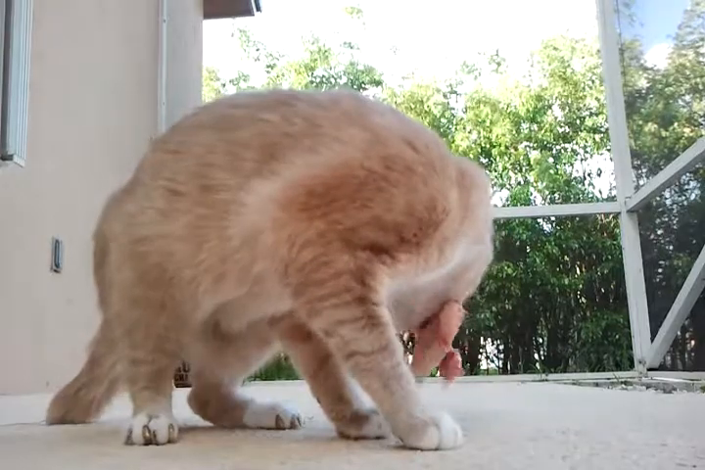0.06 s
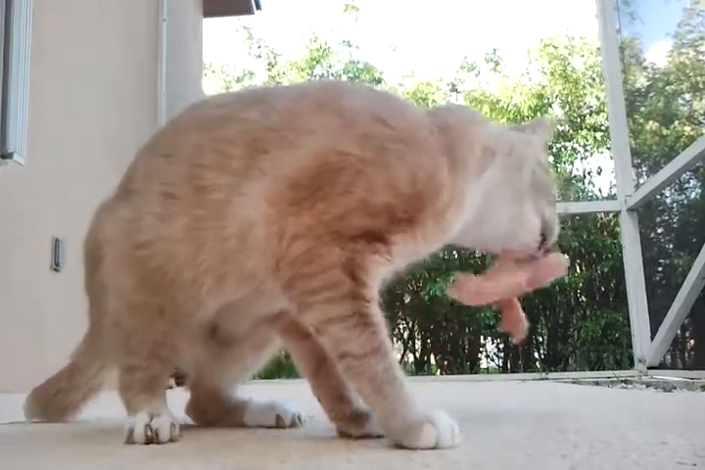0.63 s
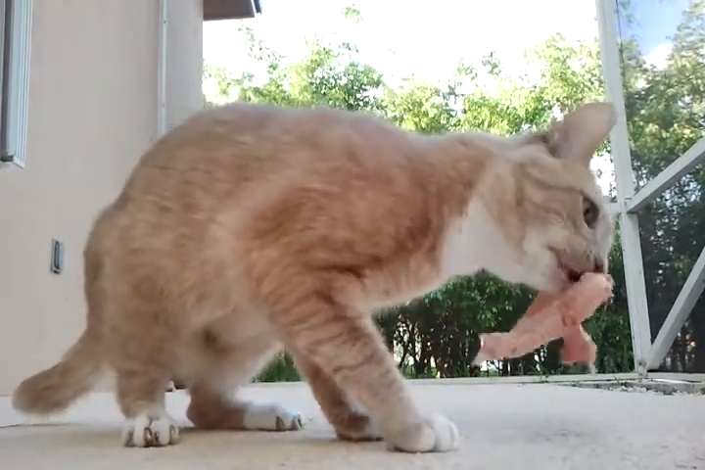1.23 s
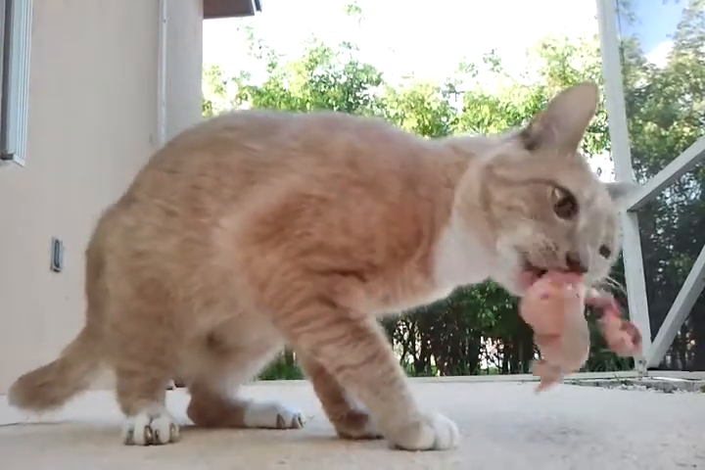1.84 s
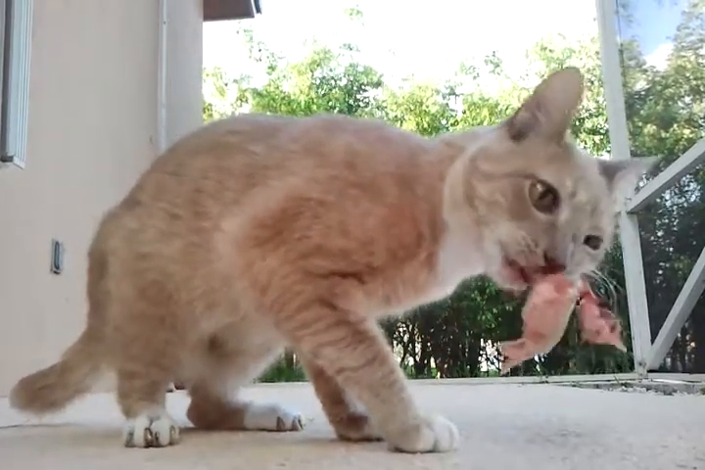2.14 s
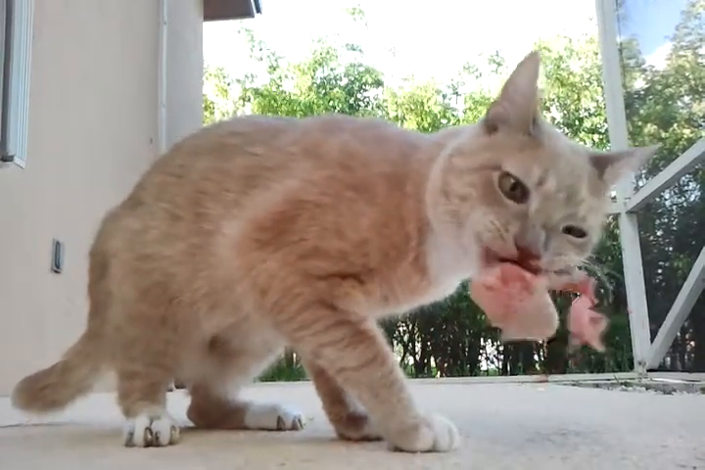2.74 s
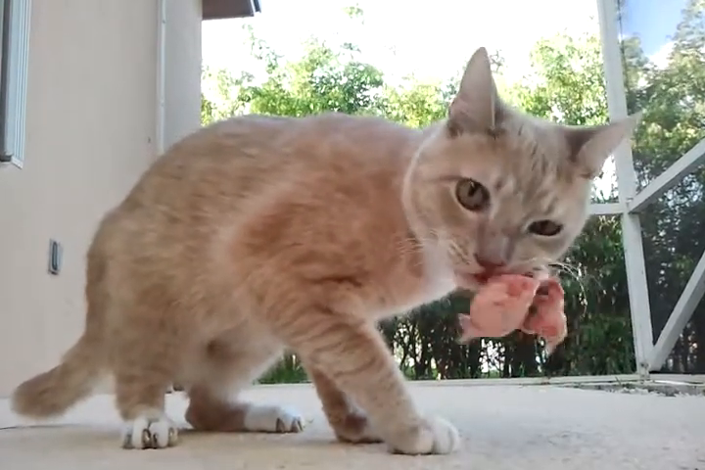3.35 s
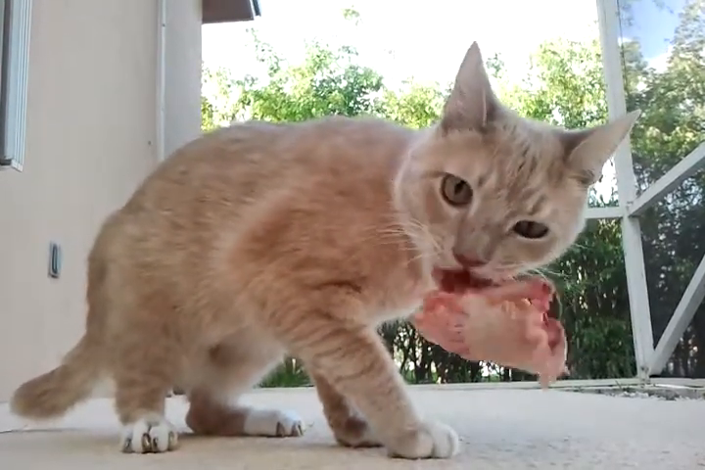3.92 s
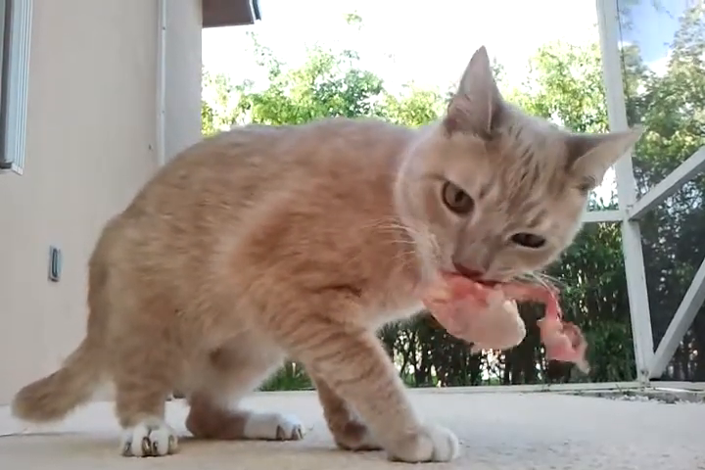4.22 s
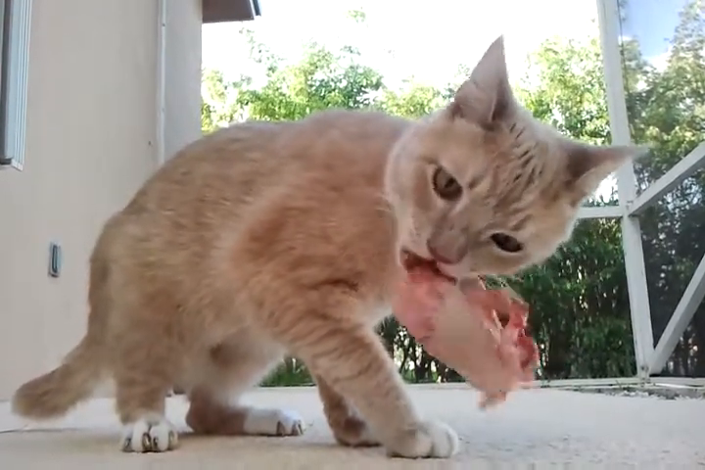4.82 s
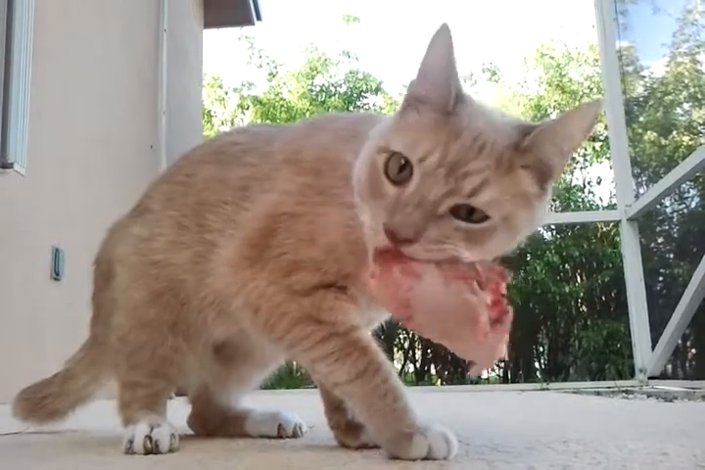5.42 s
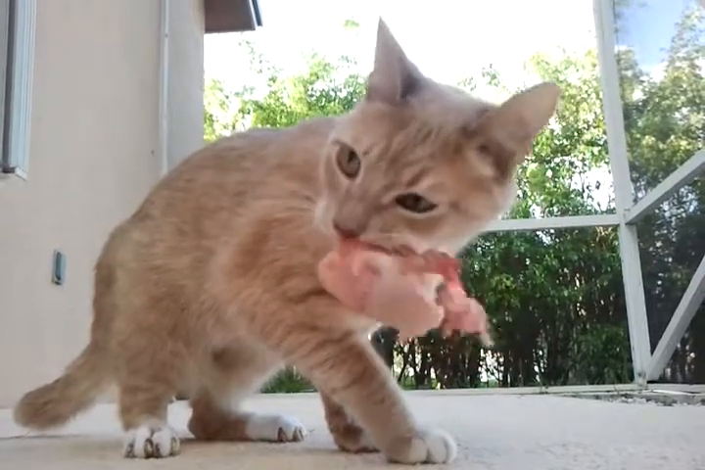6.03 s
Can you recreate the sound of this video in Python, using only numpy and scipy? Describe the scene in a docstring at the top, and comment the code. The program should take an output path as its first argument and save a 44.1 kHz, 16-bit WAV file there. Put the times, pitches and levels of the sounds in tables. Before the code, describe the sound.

Two quick, crisp cracks of bone open the sound as a cat eats a raw chicken wing on a screened porch. The cat then chews softly and steadily, its teeth clicking and the meat squishing in tiny wet pops, all heard from close by. A gentle outdoor hiss and a far motor hum lie underneath, and distant traffic rises gently toward the end, around one brighter tooth click.

```python
"""A screened porch, where a cat chews a raw chicken wing close by.
The bone gives way in two sharp crunches, each a run of fractures that ring it and knock the jaw.
Then teeth tick and wet meat squelches in clouds of tiny pops, with a short echo off walls and roof.
Behind it: soft outdoor air and hiss, a far motor hum that fades, and distant traffic that swells
near the end."""
import sys
import numpy as np
from scipy import signal
from scipy.fft import rfft, irfft, next_fast_len
from scipy.io import wavfile
from scipy.ndimage import uniform_filter1d, map_coordinates

SR = 44100
rng = np.random.default_rng(int(sys.argv[2]) if len(sys.argv) > 2 else 0)


def master(y):
    """Save y as 16-bit WAV."""
    cut = np.clip(np.atleast_2d(y).T, -1, 1)
    pcm = np.round(cut * 32767)  # scale
    wavfile.write(sys.argv[1], SR, pcm.astype(np.int16))


N = 272096


def amp(db):
    """Decibels to gain."""
    return 10 ** (np.asarray(db) / 20)


def unit(x):
    """Scale to rms 1."""
    return x / np.sqrt(np.mean(x ** 2) + 1e-20)


def along(points, hz):
    """Read (frequency [Hz], value) points on a log frequency axis."""
    f, v = np.transpose(points)
    return np.interp(np.log(hz + 1), np.log(f), v)


def wobble(rate):
    """A smooth random curve, rate knots a second."""
    knots = rng.standard_normal(int(N * rate / SR) + 4)
    return map_coordinates(knots, [np.arange(N) * rate / SR])


def filtered(x, response):
    """Shape x with a frequency response."""
    m = next_fast_len(len(x) + SR // 10)
    return irfft(rfft(x, m) * response(np.fft.rfftfreq(m, 1 / SR)), m)[:len(x)]


def resonance(f, hz, width):
    """A causal resonance, applied twice for steep skirts."""
    return (1j * f * width / (hz * hz - f * f + 1j * f * width)) ** 2


def hump(f, hz, octaves):
    """A round-topped band around hz; octaves is its full width at half power."""
    return np.sqrt(.5 ** ((2 * np.log2((f + 1) / hz) / octaves) ** 2))


def noise(spectrum):
    """Coloured noise of rms 1."""
    return unit(filtered(rng.standard_normal(N), lambda f: amp(along(spectrum, f))))


def tone(hz):
    """A sine of rms 1 that follows a pitch curve."""
    return unit(np.sin(2 * np.pi * np.cumsum(hz) / SR))


def add(track, s, sound):
    """Mix a sound into the track at time s."""
    start = max(round(s * SR), 0)
    track[start:start + len(sound)] += sound[:N - start]


def patchy(x, depth_db):
    """Moving air lets patches of a far sound swell and fade."""
    z = signal.stft(x, nperseg=2048)[2]
    patches = uniform_filter1d(rng.standard_normal(z.shape), size=7, axis=0)
    patches = uniform_filter1d(patches, size=5, axis=1)
    return unit(signal.istft(z * amp(depth_db * unit(patches)), nperseg=2048)[1][:N])


def passing(nearest_s, half_s, db):
    """Gain of a source on a straight road: one over distance, 3 dB down half_s from its nearest."""
    return amp(db) / np.hypot(1, (np.arange(N) / SR - nearest_s) / half_s)


def outdoor_air(level_db=-49.5):
    """A soft, steady bed of open air."""
    # air colour: (frequency [Hz], relative level [dB])
    spectrum = [(20, -46), (35, -20), (55, -9), (85, 5), (130, -0.5), (235, 4.5), (320, -3.5), (550, -5.5),
                (900, 0.5), (1250, 0), (1800, -4), (2600, -10), (4000, -32.5)]
    return amp(level_db + 0.33 * wobble(4.37)) * patchy(noise(spectrum), depth_db=0.58)


def hiss(far_db=-52):
    """A fine hiss that grows as the traffic passes."""
    # hiss colour: (frequency [Hz], relative level [dB])
    spectrum = [(1500, -18), (2600, -10), (3050, -3), (3450, 1.5), (4000, -5.5), (4900, -5), (5700, -9),
                (6500, -11), (7300, -10.5), (8000, -18), (8600, -33)]
    swell = np.hypot(amp(far_db), passing(nearest_s=5.34, half_s=1.46, db=-46))
    return swell * amp(0.23 * wobble(9)) * noise(spectrum)


def traffic_roar():
    """Far tyres roar past, with a drone inside the noise."""
    # tyre roar: (frequency [Hz], relative level [dB])
    tyres = [(200, -22), (400, -3), (600, -3.5), (830, -1), (1200, -2), (1700, -5.5), (2500, -10.5),
             (5000, -32)]
    # drone bands: (frequency [Hz], width [Hz], level against the tyres [dB])
    drone = [(693, 15, -21.5), (877, 68, -14.5)]
    roar = patchy(noise(tyres), depth_db=2.5)
    for hz, width, db in drone:
        roar += amp(db) * unit(filtered(rng.standard_normal(N), lambda f: resonance(f, hz, width)))
    return passing(nearest_s=5.23, half_s=0.69, db=-45) * roar


def traffic_rumble(peak_s=5.3, peak_db=-49, rise_db_per_s=22, fall_db_per_s=4.5):
    """The low end comes in quickly once the traffic is close, and lingers."""
    # rumble colour: (frequency [Hz], relative level [dB])
    spectrum = [(90, -27.5), (135, -1), (168, 3.5), (210, -3), (330, -0.5), (480, -2), (700, -35)]
    since = np.arange(N) / SR - peak_s
    level_db = peak_db + np.minimum(rise_db_per_s * since, -fall_db_per_s * since)
    return amp(level_db) * patchy(noise(spectrum), depth_db=1.5)


def traffic_whine(hz=823):
    """A thin, wavering whine goes by with the traffic."""
    swell = passing(nearest_s=4.8, half_s=1.1, db=-60.5)
    return swell * amp(2.5 * wobble(6)) * tone(hz + 3 * wobble(7))


def motor_hum(hz=138.4, start_db=-54, rest_db=-69, fade_s=5):
    """A far motor's hum wavers and fades toward a faint resting level."""
    level_db = rest_db + (start_db - rest_db) * np.exp(-np.arange(N) / SR / fade_s)
    return amp(level_db + 1.3 * wobble(9)) * tone(hz + 0.66 * wobble(10))


def porch(x, delay_s=0.011, build_s=0.01):
    """Walls and roof answer a moment later with a short diffuse tail."""
    # porch ring: (frequency [Hz], time to fall 60 dB [s])
    ring_times = [(300, 0.21), (5000, 0.21), (8000, 0.22)]
    # tail EQ: (frequency [Hz], gain [dB])
    colour = [(2500, -15.5), (3900, 10.5), (4900, -5.0), (6000, 9.5), (7000, -9.0)]
    hz, t, z = signal.stft(rng.standard_normal(SR // 2), SR, nperseg=256)
    swell = 1 - np.exp(-np.maximum(t - delay_s, 0) / build_s)
    decay = amp(-60 * t / along(ring_times, hz)[:, None])
    tail = signal.istft(z * swell * decay, SR, nperseg=256)[1]
    tail = filtered(tail / np.linalg.norm(tail), lambda f: amp(along(colour, f)))
    return signal.fftconvolve(x, tail)[:N]


def meat(spiky=0.86, chew_count=12, start_s=1.17, chews_per_s=2.4, uneven_s=.02):
    """Each squeeze is a short cloud of tiny wet pops; soft ones keep time with the jaw."""
    # standout wet squeezes: (centre [s], length [s], level [dB], pitch [Hz], width [octaves])
    squelches = [(0.607, 0.015, -44, 4060, .35), (0.649, .014, -41, 2600, 0.64),
                 (1.207, .009, -42.5, 3800, 0.4), (1.496, .022, -47.5, 3300, .9),
                 (1.628, 0.023, -47.5, 3180, 0.64), (2.167, 0.016, -44.5, 3300, .27),
                 (2.997, .011, -41.5, 3260, .55), (5.49, .016, -42.5, 3800, .45),
                 (5.552, .022, -42, 3480, .25), (5.69, .019, -43.5, 3950, .32)]
    out = np.zeros(N)
    t = np.arange(-SR // 10, SR // 10) / SR
    beats = start_s + np.arange(chew_count) / chews_per_s + uneven_s * rng.standard_normal(chew_count)
    soft_chews = [(s, 0.027, -52, 3600, .85) for s in beats if s < N / SR]  # same columns
    for s, length, db, hz, octaves in squelches + soft_chews:
        pops = rng.standard_normal(len(t)) * np.exp(spiky * rng.standard_normal(len(t)))
        squeeze = np.exp(-2 * (t / length) ** 2)
        add(out, s + t[0], amp(db) * squeeze * unit(filtered(pops, lambda f: hump(f, hz, octaves))))
    return out


def tick(hz, octaves, rebound_gain=0.53, rebound_s=0.001024):
    """A snap of a few cycles and its weaker rebound: peak 1, centred in 20 ms."""
    blow = signal.unit_impulse(SR // 50, 'mid')
    rebound = np.roll(blow, round(rebound_s * rng.uniform(.6, 1.4) * SR))
    snap = filtered(blow + rebound_gain * rebound, lambda f: hump(f, hz, octaves))
    return snap / np.abs(snap).max()


def teeth(faint_count=40, faint_db=-41, spread_db=7):
    """Distinct tooth contacts, with faint sticky ticks scattered between them."""
    # tooth contacts: (time [s], peak level [dB], pitch [Hz], width [octaves])
    contacts = [(.2532, -27.5, 4500, 0.31), (.6372, -25, 3650, .67), (1.121, -30, 2600, .46),
                (1.212, -24, 3450, 0.72), (1.480, -32.5, 2500, .35), (1.581, -27.5, 2440, 0.55),
                (1.784, -20.5, 2800, 1.06), (1.948, -30, 5700, .51), (2.014, -29, 3550, .76),
                (2.388, -24, 3970, 0.77), (2.611, -33, 3250, .3), (3.146, -30.5, 4130, .33),
                (3.661, -25.5, 3360, 0.94), (3.876, -25.5, 3300, .27), (4.124, -32, 3800, .3),
                (4.849, -30.5, 4300, .3), (5.492, -12, 4040, 0.34), (6.140, -23, 3580, 0.76)]
    out = np.zeros(N)
    for s, db, hz, octaves in contacts:
        add(out, s - 0.01, amp(db) * tick(hz, octaves))  # the snap's centre lands on s
    for when, size, pitch in rng.random((faint_count, 3)):
        add(out, when * N / SR, amp(faint_db + spread_db * size ** 2) * tick(2400 * 2 ** pitch, 0.6))
    return out


def fracture(tilt_db, knock_db, splinter_s=0.00034, splinter_db=-18, jaw_hz=590):
    """One fracture sheds splinters, rings the bone and knocks the jaw: peak 1."""
    # bone resonances: (frequency [Hz], width [Hz], relative level [dB])
    modes = [(2660, 890, -21), (3200, 480, -9.5), (4700, 410, -3.5), (4907, 470, 3.5), (5270, 300, -2.5),
             (6880, 300, -11), (7140, 630, -3.5), (8250, 450, -24)]
    t = np.arange(SR // 100) / SR
    force = amp(splinter_db) * rng.standard_normal(len(t)) * np.exp(-t / splinter_s)
    force[0] = rng.choice([-1, 1])  # the break itself
    tilted = [(hz, width, db + tilt_db * np.log2(hz / 5000)) for hz, width, db in modes]
    ring = filtered(force, lambda f: sum(amp(db) * resonance(f, hz, width) for hz, width, db in tilted))
    knock = filtered(force, lambda f: resonance(f, jaw_hz, 220) + 0.88 * resonance(f, 1510, 1100))
    crack = unit(ring) + amp(knock_db) * unit(knock)
    return crack / np.abs(crack).max()


def crunches(count=10, gap_s=0.002, uneven=.3, scatter_db=1.5, tilt_scatter_db=12):
    """Each bite breaks the bone in a quick, uneven run of fractures of varying size and brightness."""
    # fracture runs; the second bite catches once and breaks on:
    # (time [s], hold [s], level [dB], treble tilt [dB/octave], jaw knock against the ring [dB])
    runs = [(0.1471, 0.0093, -4.5, 4, -28), (0.3023, 0.0046, -10.5, -12.5, -27),
            (.3138, .0055, -9, -10, -15)]
    release_db_per_s, knock_rise_db_per_s = 3400, 1100
    out = np.zeros(N)
    for s, hold, db, tilt_db, knock_db in runs:
        for k, (shift, size, colour) in enumerate(rng.uniform(-1.1, 1, (count, 3))):
            age = gap_s * (k + uneven * shift * (k > 0))
            # the knock grows as the jaw closes; after the hold the fractures die away
            knock = knock_db - knock_rise_db_per_s * max(hold - age, 0)
            level = db + scatter_db * size - release_db_per_s * max(age - hold, 0)
            add(out, s + age, amp(level) * fracture(tilt_db + tilt_scatter_db * colour, knock))
    return out


def scene(porch_send_db=-20):
    """The chewing cat and its porch echo in front of the outdoor bed, in mono."""
    cat = crunches() + teeth() + meat()
    echo = porch(amp(porch_send_db) * cat)
    outdoors = outdoor_air() + hiss() + traffic_roar() + traffic_rumble() + traffic_whine() + motor_hum()
    return (cat + echo + outdoors)[None]


def record(dry):
    """A steep low-pass takes off the top treble."""
    top_hz = 8650
    return np.array([filtered(ch, lambda f: 1 / np.sqrt(1 + (f / top_hz) ** 110)) for ch in dry])


dry = scene()
out = record(dry)
master(out)
```